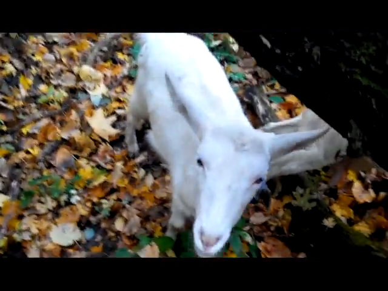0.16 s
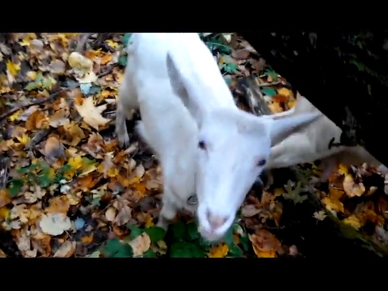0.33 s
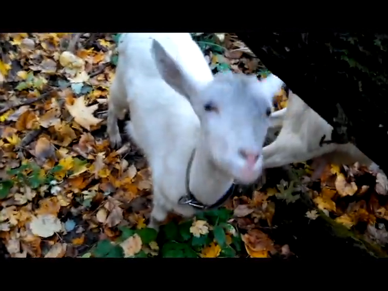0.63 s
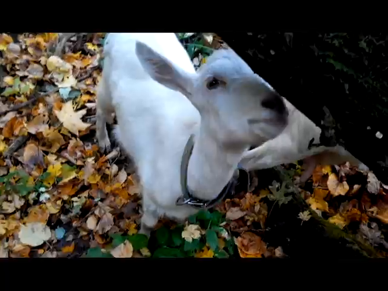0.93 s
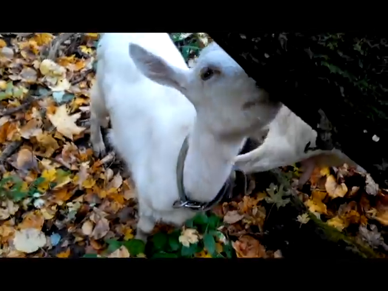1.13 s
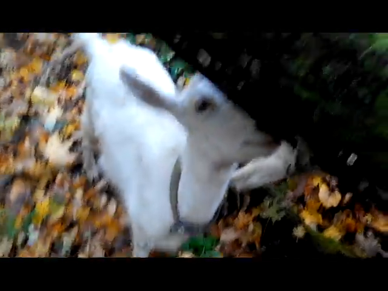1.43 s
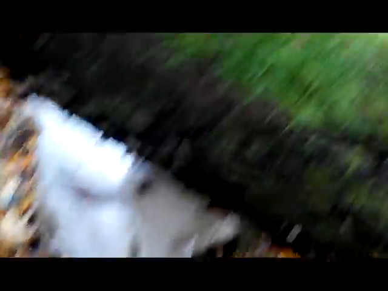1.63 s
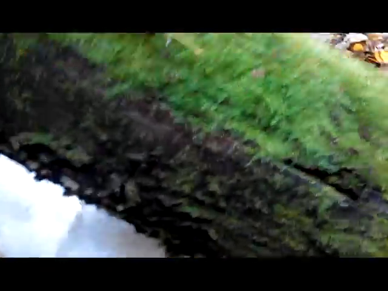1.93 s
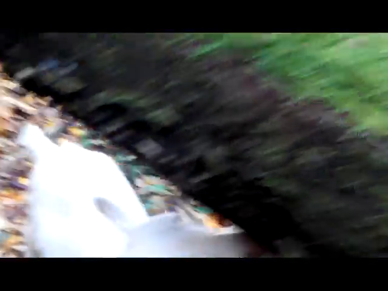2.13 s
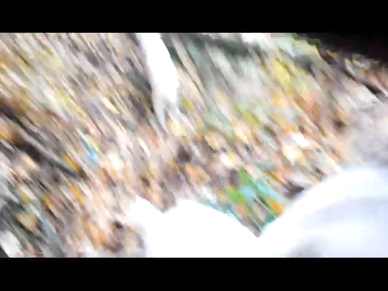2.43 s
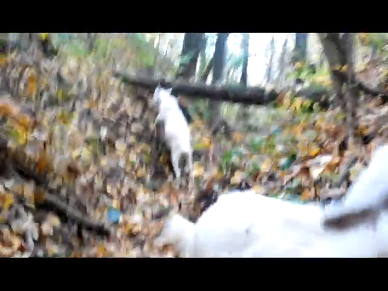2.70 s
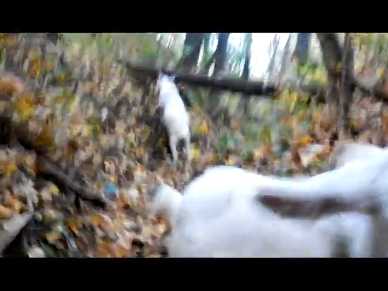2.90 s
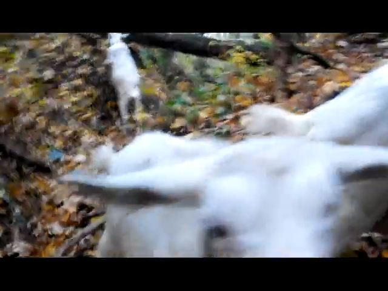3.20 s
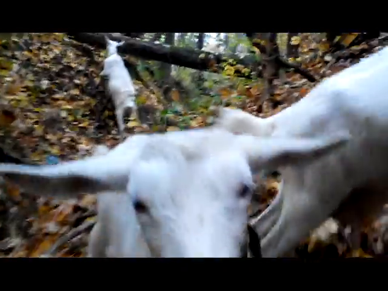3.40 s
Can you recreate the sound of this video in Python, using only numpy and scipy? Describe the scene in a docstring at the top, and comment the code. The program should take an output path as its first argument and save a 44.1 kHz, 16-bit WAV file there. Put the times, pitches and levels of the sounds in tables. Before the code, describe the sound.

Goats nudge a hand-held camera, making dull thuds, clicks and dry scraping over quiet air hiss

```python
"""A hand-held camera, jostled among goats in a quiet wood, is heard mainly through its own body.
Soft bumps excite a damped resonance near 100 Hz, and the plastic shell ticks and twice snaps into modal ringing.
Stick-slip friction hisses and rings near 4 kHz by the left port, brushes brightly on the right,
and scrapes coarsely over a low rumble; shaped noise gives the still air and microphone hiss."""
import sys
import numpy as np
from scipy import signal
from scipy.fft import rfft, irfft
from scipy.io import wavfile

SR = 44100
rng = np.random.default_rng(int(sys.argv[2]) if len(sys.argv) > 2 else 0)


def digitize_waveform(pressure):
    """Quantize a signal to 16-bit integers and store it at the path in sys.argv[1].

    Rows of a 2-D input are taken as channels; values are limited to [-1, 1].
    """
    field = np.atleast_2d(pressure).T
    bounded = np.clip(field, -1, 1)
    quanta = np.round(bounded * 32767).astype(np.int16)
    wavfile.write(sys.argv[1], SR, quanta)


N = 156555  # samples, 3.55 s
TIME_S = np.arange(N) / SR


def undb(db):
    """Logarithmic level: decibels become an amplitude gain."""
    return 10 ** (np.asarray(db) / 20)


def unit(x):
    """Normalization: the signal is scaled to rms 1."""
    return x / np.sqrt(np.mean(x ** 2))


def pan(left_minus_right_db):
    """Interchannel level difference: half is given to each side, with opposite signs."""
    return undb(np.array([[left_minus_right_db], [-left_minus_right_db]]) / 2)


def curve(rows):
    """Amplitude envelope: levels in dB are joined by straight lines in time."""
    at_s, level_db = np.array(rows).T
    return undb(np.interp(TIME_S, at_s, level_db))


def highpass(x, order, cutoff_hz):
    """High-pass response: a Butterworth filter attenuates the bass."""
    b, a = signal.butter(order, cutoff_hz, "high", fs=SR)
    return signal.lfilter(b, a, x)


def colour(x, rows, column=1):
    """Minimum-phase filtering: a spectrum given in dB is imposed, keeping the power of white noise."""
    rows, size = np.array(rows, float), 4096
    hz = np.maximum(np.arange(size // 2 + 1) * SR / size, 1)
    spectrum_db = np.interp(np.log(hz), np.log(rows[:, 0]), rows[:, column])
    # Folding the cepstrum onto positive time makes the response causal
    cepstrum = irfft(np.log(undb(spectrum_db)))
    cepstrum[1:size // 2] *= 2
    cepstrum[size // 2 + 1:] = 0
    response = irfft(np.exp(rfft(cepstrum)))
    return signal.fftconvolve(x, response / np.sqrt(np.sum(response ** 2)))[:N]


def ports(pair, rows):
    """Spectral shaping at two ports: the last column of the table serves the right one."""
    return np.array([colour(pair[0], rows), colour(pair[1], rows, column=-1)])


def alike(a, b, correlation):
    """Interchannel correlation: shared and opposed parts are mixed into a stereo pair."""
    c = np.clip(correlation, -1, 1)
    shared = np.sqrt(1 + c) * a
    opposed = np.sqrt(1 - c) * b * np.array([[1], [-1]])
    return (shared + opposed) / np.sqrt(2)


def walk(knots_per_s):
    """Random modulation: normally distributed knots are joined by straight lines."""
    knots = rng.standard_normal(2048)
    return np.interp(TIME_S * knots_per_s, np.arange(len(knots)), knots)


GRAIN_SPREAD_DB = 2  # mean of the random boost per grain


def slips(per_s):
    """Stick-slip excitation: dense random impulses of uneven size."""
    struck = rng.random(N) < per_s / SR
    boost_db = GRAIN_SPREAD_DB * np.minimum(rng.exponential(size=N), 2 * np.pi)
    return unit(struck * rng.standard_normal(N) * undb(boost_db))


GRAINS_PER_S, SCRAPE_GRAINS_PER_S = 7000, 2500  # fine and coarse contact
FLICKER_KNOTS_PER_S, FLICKER_DB, BRUSH_FLICKER_DB = 44.8, 1.63, 1.94  # spread of the knots in dB
RUB_CORRELATION, BRUSH_CORRELATION, BODY_CORRELATION = 0.91, -0.54, 0.93  # left with right


def friction(per_s, correlation, flicker_db):
    """Dry friction: slips at both ports are modulated by an unsteady pressure."""
    grains = alike(slips(per_s), slips(per_s), correlation)
    return grains * undb(flicker_db * walk(FLICKER_KNOTS_PER_S))


def bursts(rows, decay_s, correlation):
    """Impulsive contact: random-sign noise starts abruptly and decays exponentially to 1/e in decay_s."""
    envelope = np.zeros(N)
    for at_s, level_db in rows:
        decay = np.exp(-np.minimum(np.abs(TIME_S - at_s) / decay_s, 20))
        envelope += undb(level_db) * (TIME_S >= at_s) * decay
    return envelope * alike(*np.sign(rng.standard_normal((2, N))), correlation)


def push(at_s, width_ms):
    """Gaussian pulse: a smooth bell whose standard deviation is width_ms."""
    offset = (TIME_S - at_s) * 1000 / width_ms
    return np.exp(-.5 * np.minimum(offset ** 2, 100))


# Firm core: level in a 1 ms push, change per ms of width, and its share of the push width
CORE_DB, CORE_DB_PER_MS, CORE_WIDTH = -37, -31, 0.27


def contact(at_s, width_ms):
    """Contact stiffness: a soft push has a narrow firm core, stronger when the push is shorter."""
    core_db = CORE_DB + CORE_DB_PER_MS * (width_ms - 1)
    return push(at_s, width_ms) + undb(core_db) * push(at_s, width_ms * CORE_WIDTH)


THUD_HZ, THUD_Q, THUD_PAN_DB = 97, 2.27, 1.5
BASS_CUT_LEFT_HZ, BASS_CUT_RIGHT_HZ = 254, 177
# Pushes on the body: start_s (centre of the push) [s], width_ms [ms], level_db (of the force) [dB]
BODY_PUSHES = [(0.332, 1.65, -17.5), (.4381, 0.83, -28.5), (1.017, 0.72, -35.5), (1.416, .97, -13),
               (1.4508, 0.95, -9.5), (1.5022, 1.1, -15), (1.5297, 1, -12), (1.589, 0.95, -10.5),
               (1.6172, 0.98, -11.5), (1.6401, 1.08, -13.5), (1.6611, 1.08, -15.5), (1.7411, 1.22, -15),
               (1.767, 0.74, -11.5), (1.822, 1, -14), (1.9697, 1.1, -17.5), (1.988, 1.07, -16.5),
               (2.053, 0.99, -9.5), (2.0994, 0.98, -12), (2.1876, 0.67, -18.5), (2.2386, 1.05, -16),
               (2.2508, 0.51, -21.5), (2.2676, .95, -12), (2.401, 1.27, -11.5), (2.531, 0.98, -16),
               (2.7104, 1.01, -10), (2.7428, 1.43, -16), (2.8827, 1.02, -15), (2.985, .53, -15.5),
               (3.0175, 1.06, -19), (3.078, 1.1, -21), (3.1085, 1.11, -18.5), (3.3263, 1.28, -16.5),
               (3.537, 0.86, -22.5)]


def bumps():
    """Damped resonance: each push swings the microphones near 100 Hz; the left one passes less bass."""
    force = sum(undb(level_db) * contact(at_s, width_ms) for at_s, width_ms, level_db in BODY_PUSHES)
    w = 2 * np.pi * THUD_HZ
    b, a = signal.bilinear([1, 0, 0], [1, w / THUD_Q, w * w], SR)
    swing = signal.lfilter(b, a, force)
    pair = [highpass(swing, 1, cutoff_hz) for cutoff_hz in (BASS_CUT_LEFT_HZ, BASS_CUT_RIGHT_HZ)]
    return np.array(pair) * pan(THUD_PAN_DB)


SHELL_LOW_HZ = 447
RATTLE_DB, RATTLE_DECAY_S = -26.5, 0.019  # level relative to the peak of the ring
# Snaps of the shell: start_s [s], left_minus_right_db [dB], crack_db (bright onset, in ticks) [dB], rise_ms [ms]
SHELL_SNAPS = [(0.2632, 5, -26.5, 0.52), (2.6342, 4.5, -53, 0.13)]
# Shell modes: pitch_hz [Hz], t60_s [s], first_snap_db [dB], second_snap_db [dB]
SHELL_MODES = [(780, 0.0053, -33, -18.5), (1190, 0.0096, -34.5, -25), (2140, 0.0072, -32, -10.5),
               (2734, 0.005, -10.5, -20), (3150, 0.0079, -29, -12), (3174, 0.0083, -15.5, -26),
               (3950, 0.0062, -17, -48)]
# Spectrum of the rattle after a snap: pitch_hz [Hz], level_db [dB]
RATTLE_SPECTRUM = [(700, -22), (1400, -13.5), (2400, -1.5), (3800, -5), (5000, -30), (9000, -21.5)]


def snaps():
    """Modal vibration: the shell gives way, rings and rattles faintly; a slower rise is less harsh."""
    out = 0
    for k, (at_s, side_db, _, rise_ms) in enumerate(SHELL_SNAPS):
        t = np.clip(TIME_S - at_s, 0, .1)
        ring = np.zeros(N)
        for j, mode in enumerate(SHELL_MODES):
            pitch_hz, t60_s, level_db = mode[0], mode[1], mode[2 + k]
            # Neighbouring modes swing in opposite directions
            ring += (-1) ** j * undb(level_db - 60 * t / t60_s) * np.sin(2 * np.pi * pitch_hz * t)
        ring = ring * (1 - np.exp(-(1000 * t / rise_ms) ** 2))
        ring = highpass(ring, 2, SHELL_LOW_HZ)
        noise = bursts([(at_s, RATTLE_DB)], RATTLE_DECAY_S, RUB_CORRELATION)
        rattle = ports(noise, RATTLE_SPECTRUM) * np.abs(ring).max()
        out = out + (ring + rattle) * pan(side_db)
    return out


TICK_DECAY_S, TICK_PAN_DB = 0.0027, -6  # the right port is louder
# Small plastic ticks: start_s [s], level_db (before panning) [dB]
PLASTIC_TICKS = [(.3185, -35), (1.0, -34.5), (1.0013, -43), (1.309, -43), (1.428, -39), (1.512, -42.5),
                 (2.1902, -28), (2.2315, -29), (2.258, -32), (2.3805, -28.5), (2.888, -35)]
# Spectrum of a tick: pitch_hz [Hz], level_db [dB]
TICK_SPECTRUM = [(500, -7.5), (1500, -30.5), (3800, 11.5), (5000, -1), (7000, -3.5), (10500, 6.5),
                 (16000, -2)]


def ticks():
    """Impulsive radiation: brief bright bursts make the ticks and the crack at the start of each snap."""
    cracks = [(at_s, crack_db) for at_s, _, crack_db, _ in SHELL_SNAPS]
    noise = bursts(list(PLASTIC_TICKS) + cracks, TICK_DECAY_S, BRUSH_CORRELATION)
    return ports(noise, TICK_SPECTRUM) * pan(TICK_PAN_DB)


CATCH_DECAY_S, RUB_RIGHT_DB = 0.0016, -12  # gain at the right port
# Pressure of the rubbing: start_s [s], level_db (before the port gain) [dB]
RUB_STRENGTH = [(0, -48.5), (.22, -51), (.76, -56.5), (.9, -61), (1.05, -56), (1.25, -52.5), (1.33, -59.5),
                (1.8, -44.5), (2.08, -45.5), (2.18, -37), (2.28, -38), (2.39, -30.5), (2.61, -29.5),
                (2.7, -37), (2.95, -39), (3.13, -45.5), (3.19, -35), (3.3, -35), (3.42, -32.5), (3.45, -45),
                (3.55, -41)]
# Catches of the rubbing: start_s [s], level_db (before the port gain) [dB]
RUB_CATCHES = [(1.0002, -32.5), (1.309, -37), (2.1902, -25), (2.381, -17.5), (2.6738, -21), (2.7404, -20),
               (2.7455, -17), (2.7525, -33), (2.9213, -21.5), (2.9258, -27), (3.413, -18), (3.421, -21.5)]
# Spectrum of rubbing, its shape at each port: pitch_hz [Hz], left_db [dB], right_db [dB]
RUB_SPECTRUM = [(398, -31.5, -35), (1440, -29, -41), (2200, -17.5, -16.5), (2940, -11, -17.5),
                (3600, -5, -13), (3820, -0.5, -19), (4086, -1, -16.5), (4500, -7.5, -28.5),
                (5700, -16.5, -19.5), (7100, -34, -33), (16000, -50.5, -31)]


def rubbing():
    """Stick-slip friction: rubbing by the left port hisses, and now and then catches and slips."""
    slide = friction(GRAINS_PER_S, RUB_CORRELATION, FLICKER_DB) * curve(RUB_STRENGTH)
    catches = bursts(RUB_CATCHES, CATCH_DECAY_S, RUB_CORRELATION)
    return ports(slide + catches, RUB_SPECTRUM) * np.array([[1], [undb(RUB_RIGHT_DB)]])


BRUSH_PAN_DB = -5  # the right port is louder
# Strength of the brushing: start_s [s], level_db (before panning) [dB]
BRUSH_STRENGTH = [(0, -58.5), (.5, -64), (.99, -62), (1.015, -54), (1.25, -52), (1.3, -59), (1.59, -58.5),
                  (1.64, -48.5), (1.93, -46), (2.08, -53), (2.33, -44.5), (2.5, -49.5), (2.59, -46.5),
                  (2.8, -52.5), (3.14, -57), (3.32, -39), (3.44, -44), (3.55, -47.5)]
# Spectrum of brushing, its shape at each port: pitch_hz [Hz], left_db [dB], right_db [dB]
BRUSH_SPECTRUM = [(500, -15.5, -15), (1610, -27.5, -19.5), (2660, 0, -1), (5240, -13, 0.5),
                  (7450, -11, -8.5), (8530, -11.5, -4.5), (10800, -8.5, 2.5), (13500, -10, -1),
                  (16400, -13, -14)]


def brushing():
    """Sliding contact: fine grains form a light bright hiss, mostly on the right."""
    slide = friction(GRAINS_PER_S, BRUSH_CORRELATION, BRUSH_FLICKER_DB) * curve(BRUSH_STRENGTH)
    return ports(slide, BRUSH_SPECTRUM) * pan(BRUSH_PAN_DB)


RUSTLE_S, RUSTLE_MS, RUSTLE_DB = 1.437, 13, -51.5  # centre, standard deviation, level
# Spectrum of the rustle: pitch_hz [Hz], level_db [dB]
RUSTLE_SPECTRUM = [(2000, -16), (4500, -7), (5600, -2), (7000, -18)]


def rustle():
    """Granular noise: uncorrelated slips swell and fade as one short crisp rustle."""
    grains = friction(GRAINS_PER_S, 0, FLICKER_DB) * push(RUSTLE_S, RUSTLE_MS)
    return ports(grains, RUSTLE_SPECTRUM) * undb(RUSTLE_DB)


SCUFF_DECAY_S = 0.0019
# Strength of the coarse scraping: start_s [s], level_db [dB]
SCRAPE_STRENGTH = [(0, -68.5), (.6, -76), (1.5, -72.5), (1.8, -58), (2.05, -60), (2.35, -54.5),
                   (2.65, -55.5), (2.95, -57), (3.1, -63), (3.33, -42.5), (3.46, -55.5), (3.55, -55.5)]
# Dull scuffs: start_s [s], level_db [dB]
DULL_SCUFFS = [(2.3168, -31), (2.376, -35), (2.926, -35), (3.379, -30.5)]
# Spectrum of scrapes and scuffs: pitch_hz [Hz], level_db [dB]
SCRAPE_SPECTRUM = [(250, -10.5), (520, -2.5), (750, -3), (1250, -0.5), (2000, -0.5), (4000, -6.5),
                   (8000, -20.5)]


def scraping():
    """Structure-borne sound: coarse grains and scuffs reach both microphones through the body."""
    grains = friction(SCRAPE_GRAINS_PER_S, BODY_CORRELATION, FLICKER_DB) * curve(SCRAPE_STRENGTH)
    scuffs = bursts(DULL_SCUFFS, SCUFF_DECAY_S, BODY_CORRELATION)
    return ports(grains + scuffs, SCRAPE_SPECTRUM)


# Strength of the rumble: start_s [s], level_db [dB]
RUMBLE_STRENGTH = [(0, -58.5), (1.35, -58.5), (1.65, -51), (2.05, -52.5), (2.3, -45.5), (2.6, -46),
                   (2.8, -47), (3.15, -51.5), (3.35, -42.5), (3.55, -47.5)]
# Spectrum of the rumble: pitch_hz [Hz], level_db [dB]
RUMBLE_SPECTRUM = [(20, -57), (45, -14), (80, 2), (130, 0.5), (220, -4.5), (400, -12), (800, -21),
                   (2000, -55.5)]


def rumbling():
    """Low-frequency body noise: as the body is moved, filtered slips sound equally at both ports."""
    return colour(slips(SCRAPE_GRAINS_PER_S), RUMBLE_SPECTRUM) * curve(RUMBLE_STRENGTH)


AIR_DB = -57.5
# Spectrum of woodland air and microphone hiss: pitch_hz [Hz], level_db [dB]
AIR_SPECTRUM = [(30, 11), (150, 11), (400, 4.5), (1000, 0), (1800, -3.5), (4000, -1), (7000, -9),
                (12000, 2.5), (16000, 5.5)]


def still_air():
    """Stationary noise: independent shaped noise at each port gives still air and microphone hiss."""
    return ports(rng.standard_normal((2, N)), AIR_SPECTRUM) * undb(AIR_DB)


def scene():
    """Superposition: all contacts with the camera add to the still air."""
    body = bumps() + snaps() + ticks()
    contacts = rubbing() + brushing() + rustle() + scraping() + rumbling()
    return body + contacts + still_air()


def record(dry):
    """Band limiting: the recorder's steep elliptic low-pass cuts the top above 16 kHz."""
    lowpass = signal.ellip(10, .2, 80, 16000, fs=SR, output="sos")  # ripple and rejection in dB
    return signal.sosfilt(lowpass, dry)


dry = scene()
out = record(dry)
digitize_waveform(out)
```